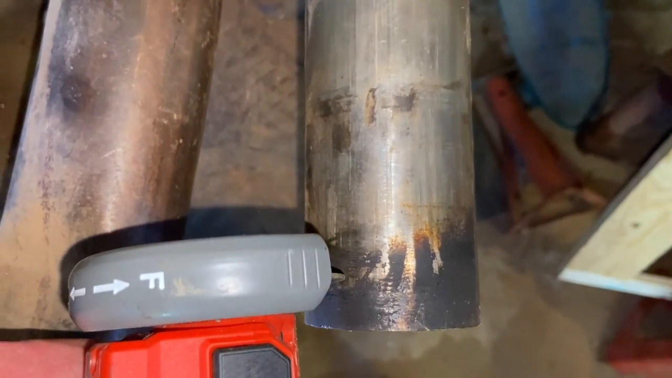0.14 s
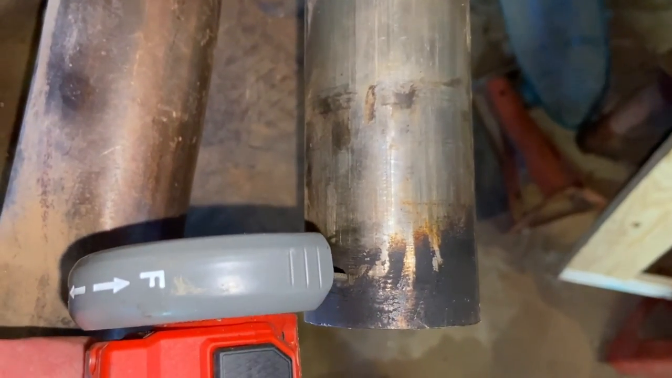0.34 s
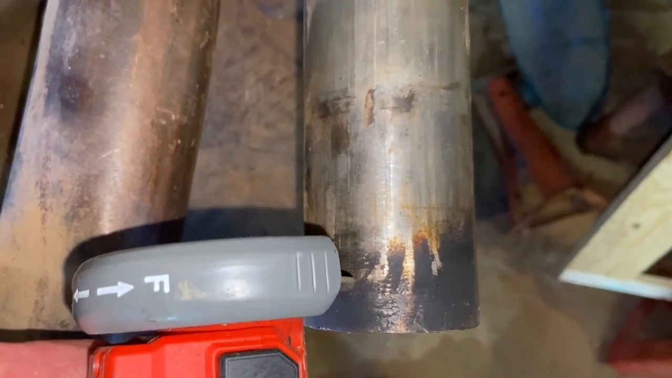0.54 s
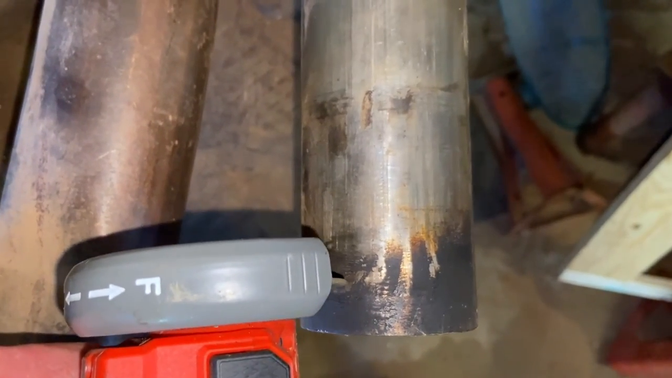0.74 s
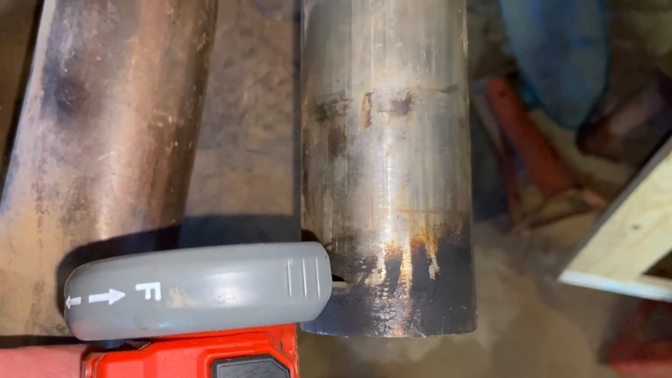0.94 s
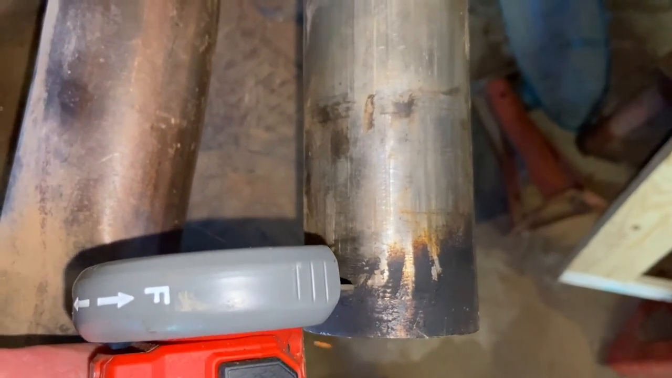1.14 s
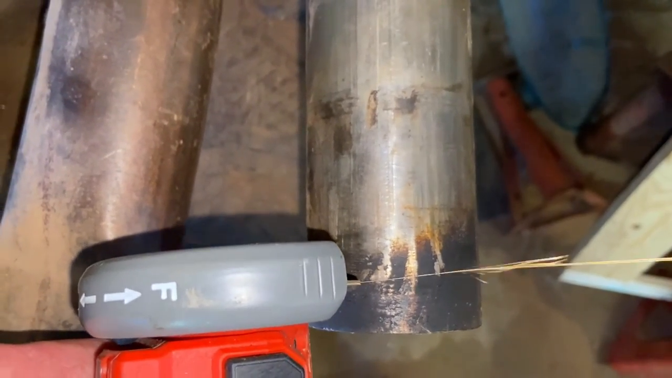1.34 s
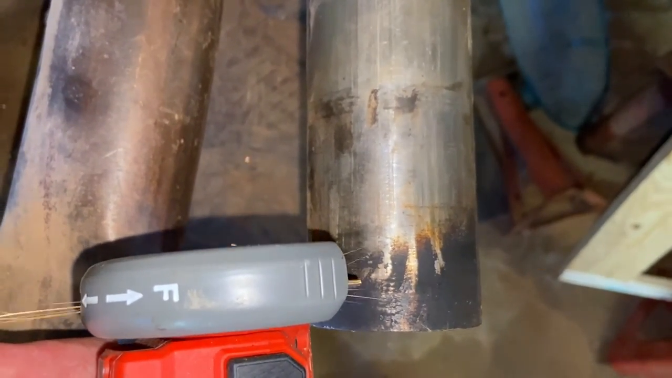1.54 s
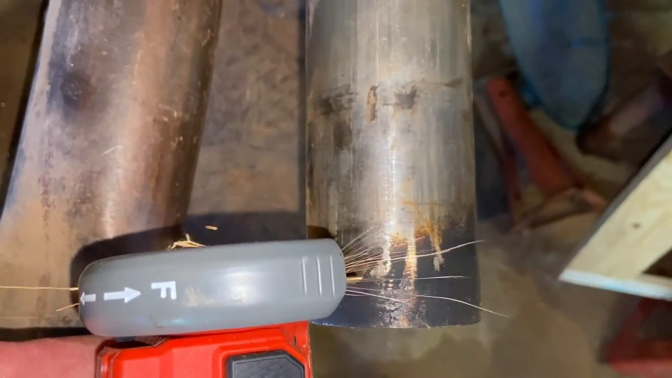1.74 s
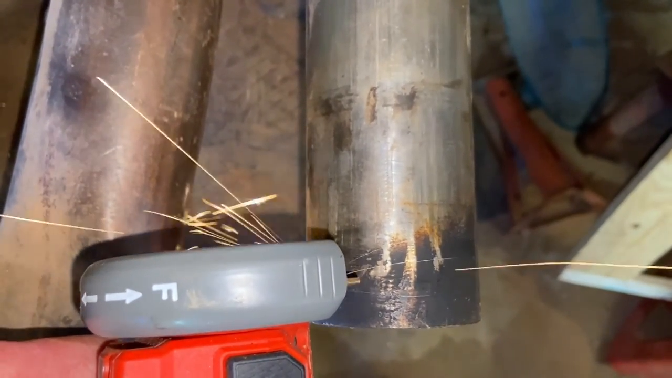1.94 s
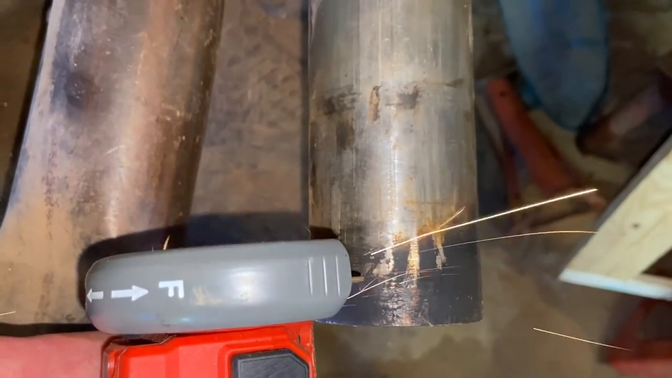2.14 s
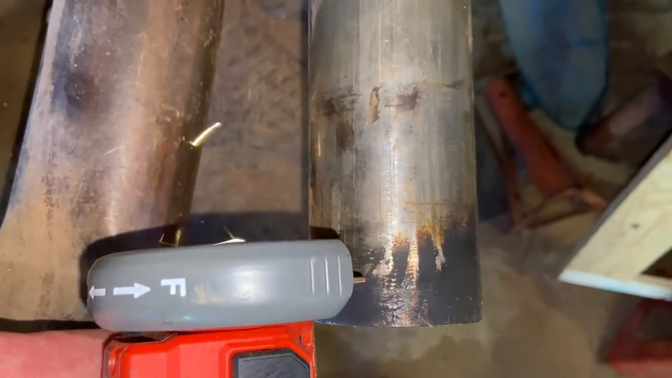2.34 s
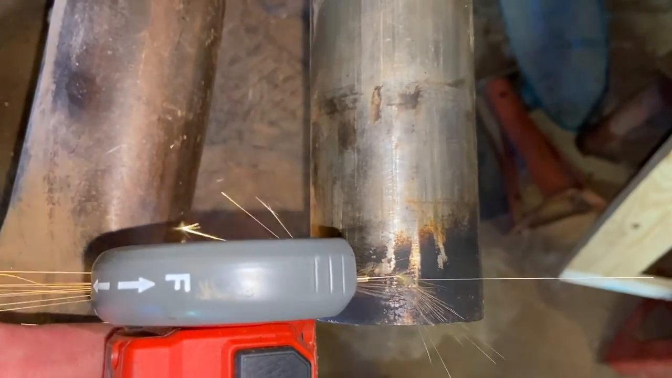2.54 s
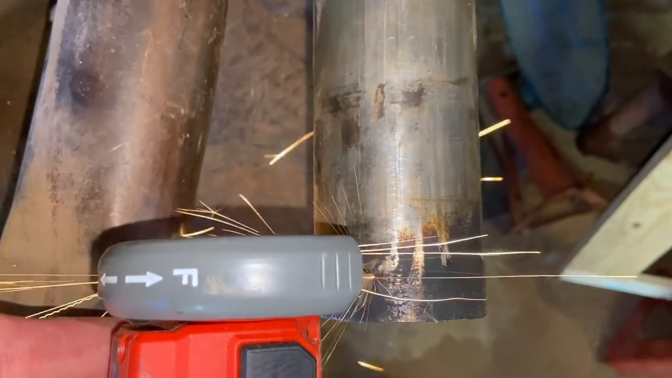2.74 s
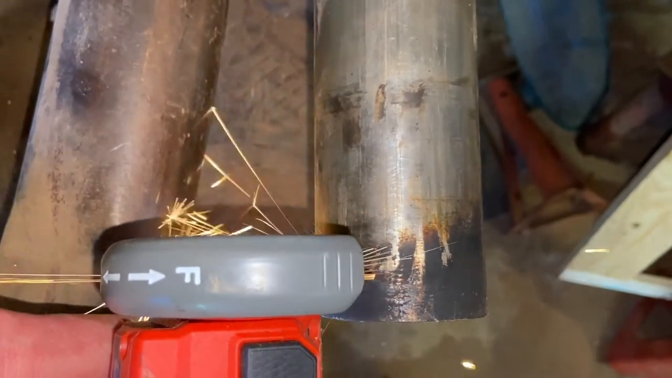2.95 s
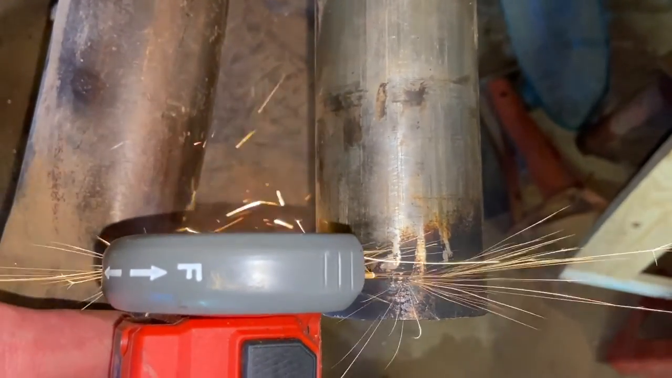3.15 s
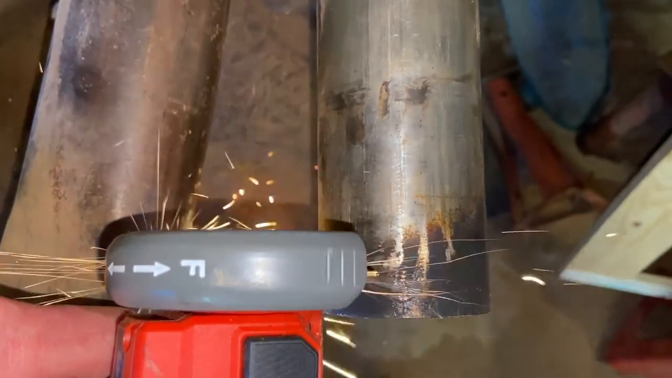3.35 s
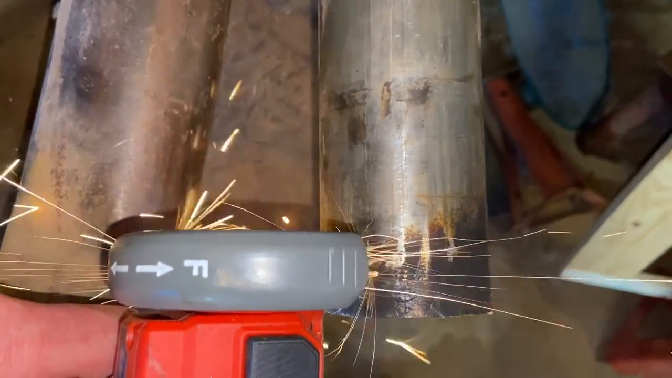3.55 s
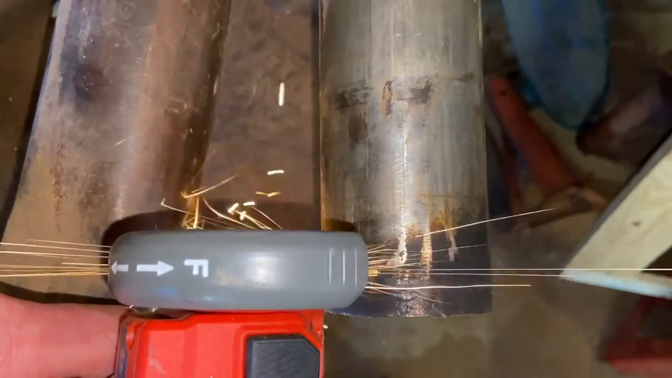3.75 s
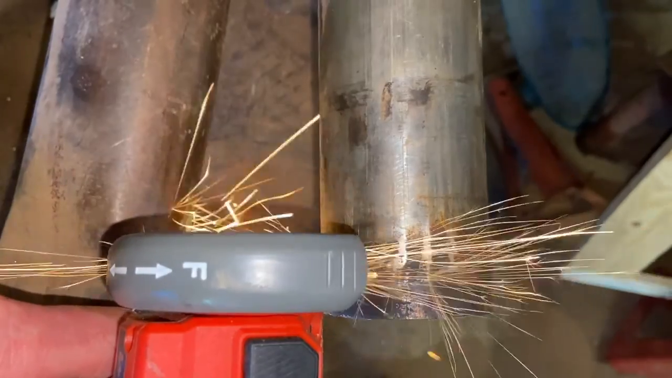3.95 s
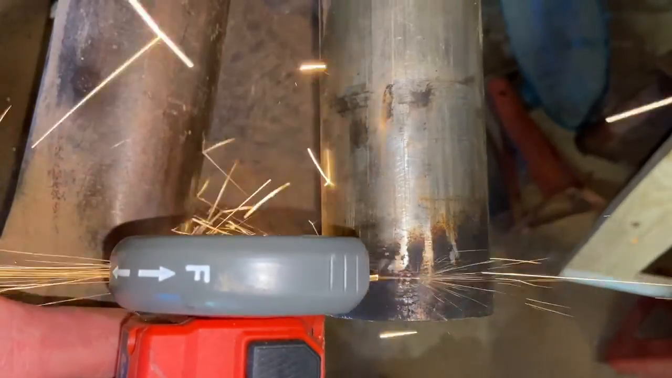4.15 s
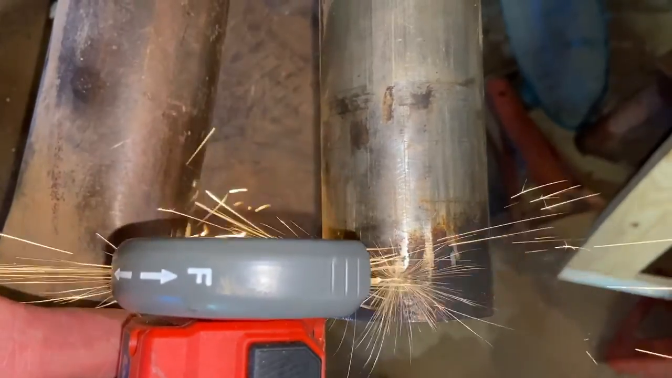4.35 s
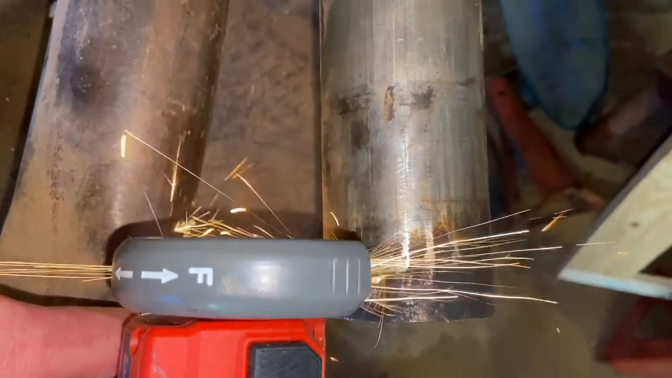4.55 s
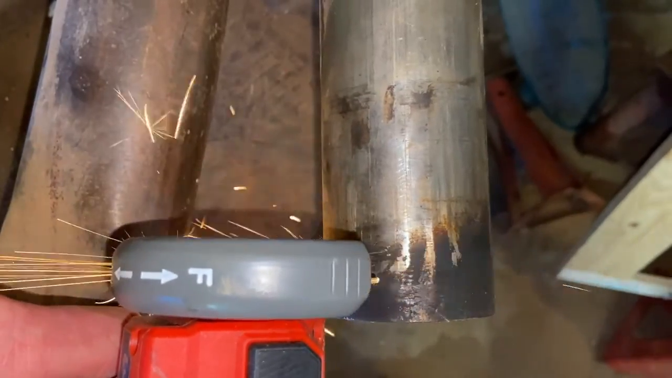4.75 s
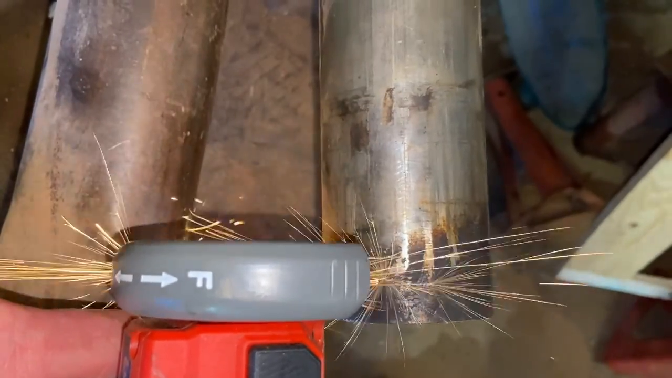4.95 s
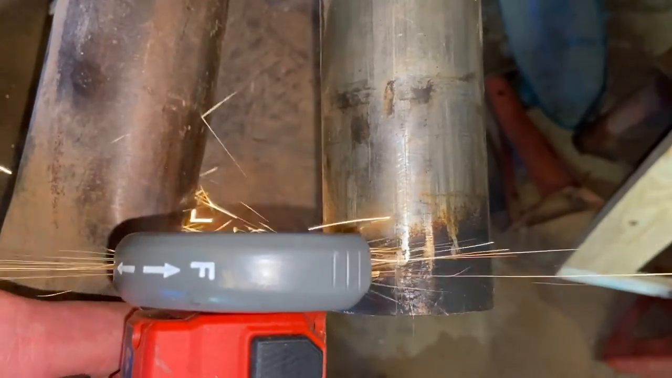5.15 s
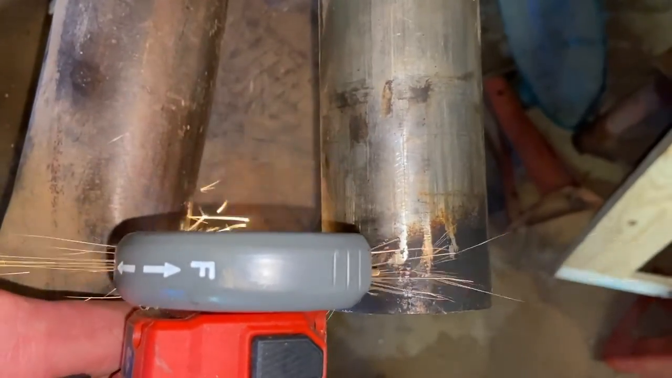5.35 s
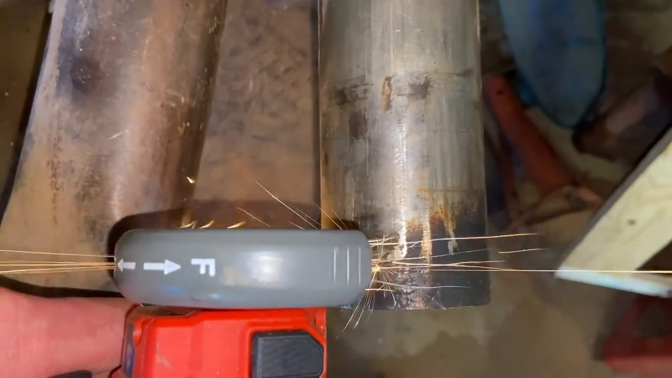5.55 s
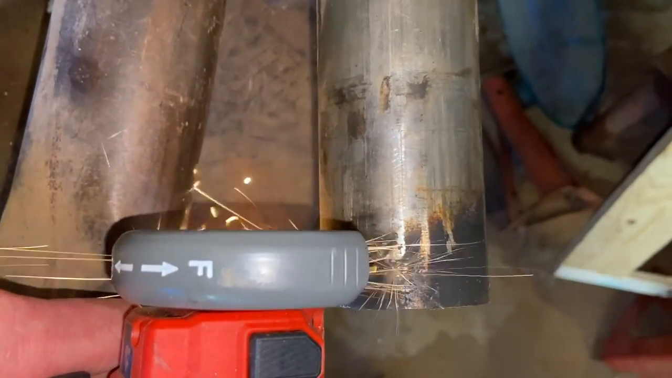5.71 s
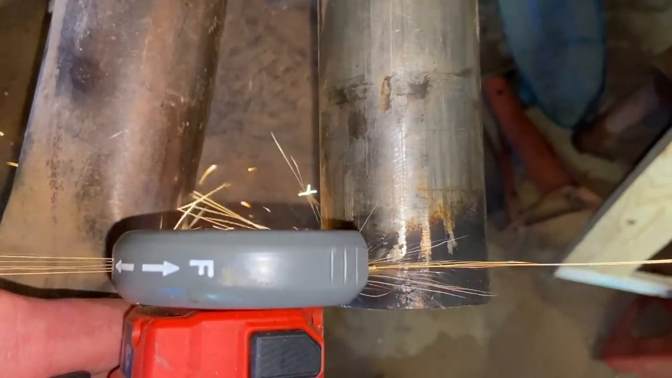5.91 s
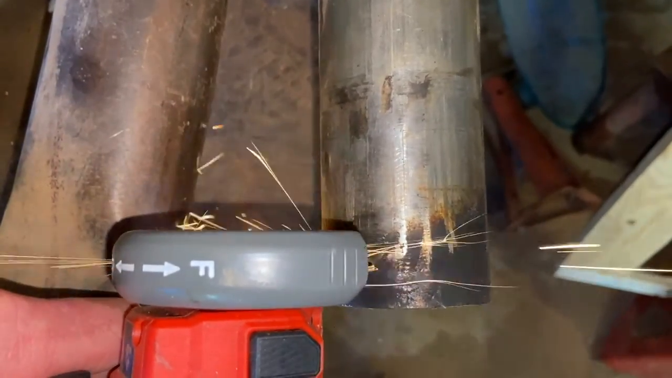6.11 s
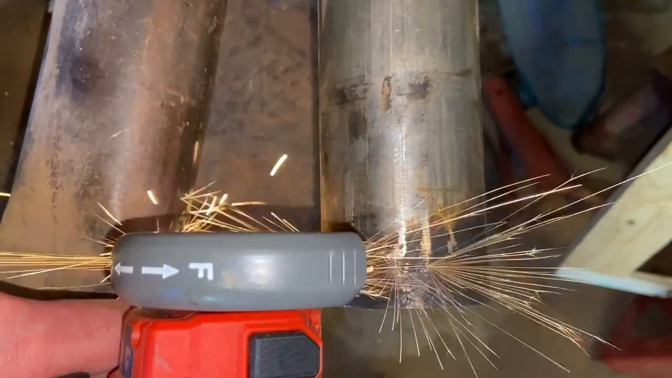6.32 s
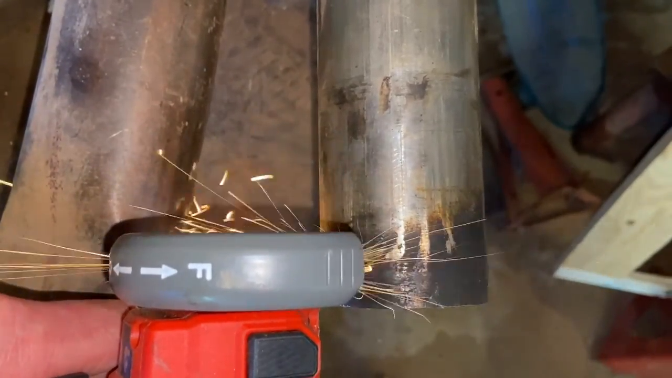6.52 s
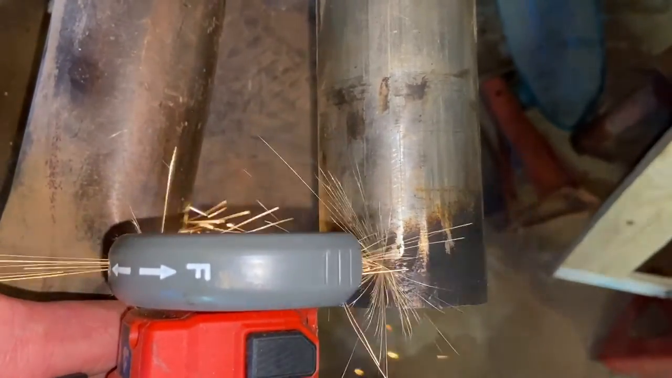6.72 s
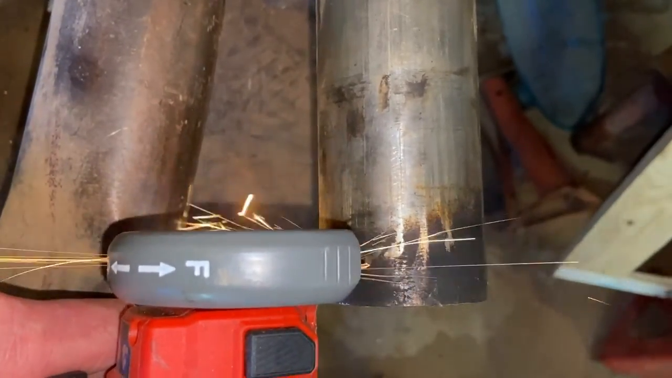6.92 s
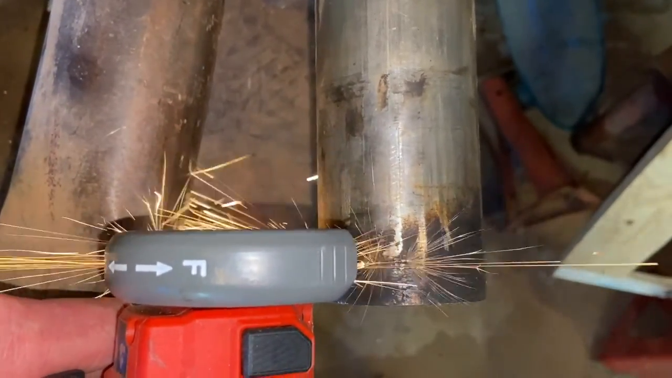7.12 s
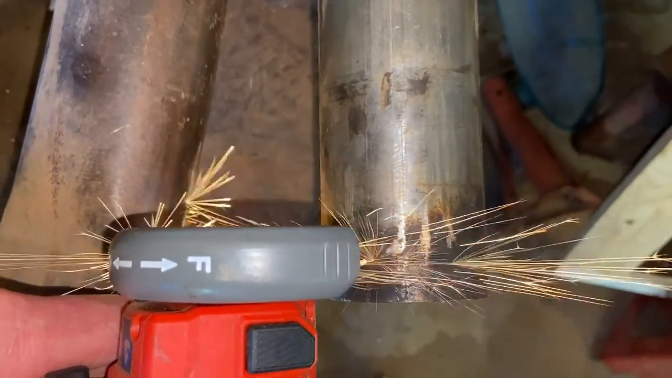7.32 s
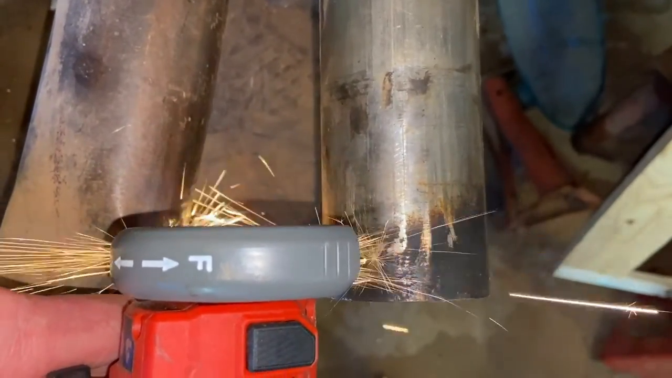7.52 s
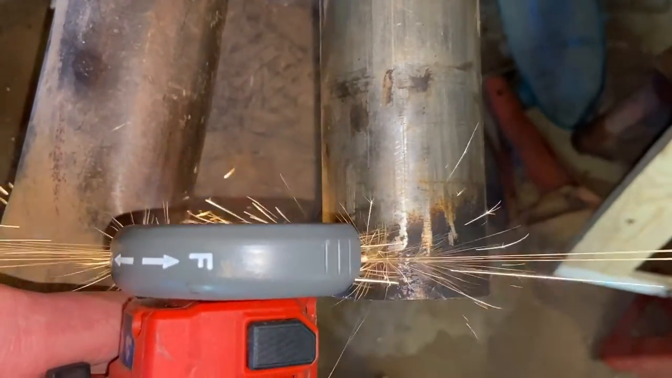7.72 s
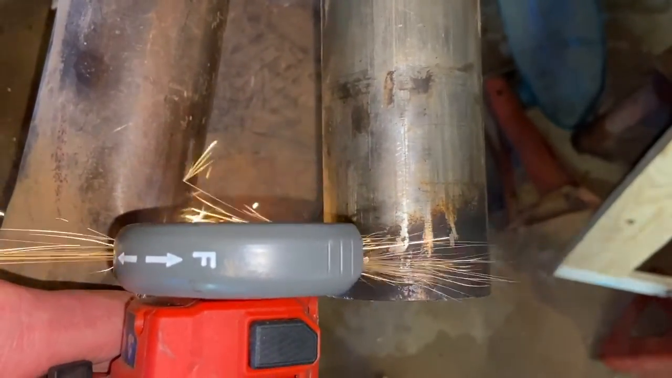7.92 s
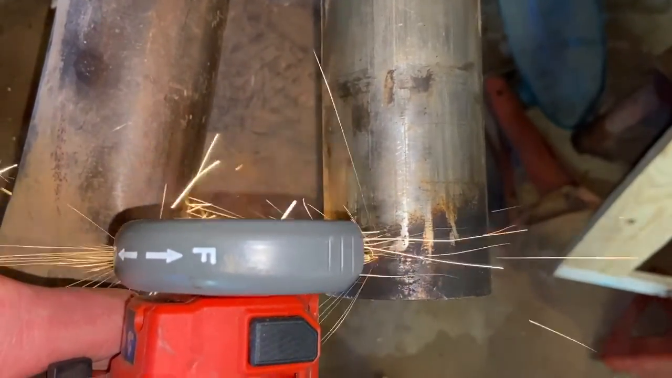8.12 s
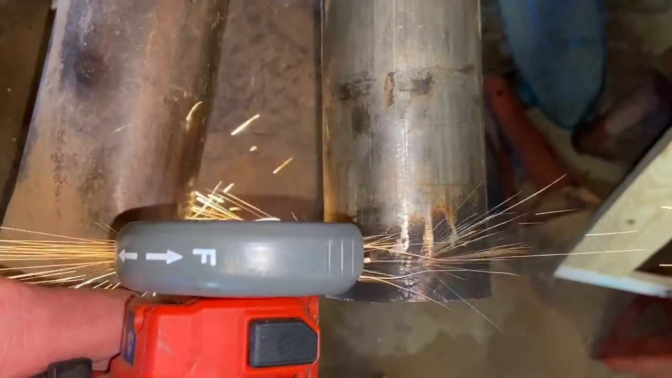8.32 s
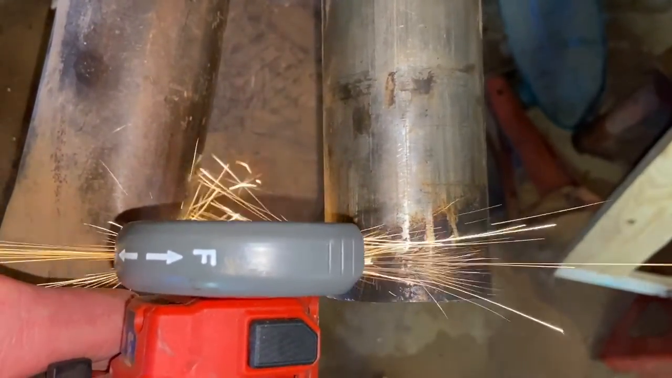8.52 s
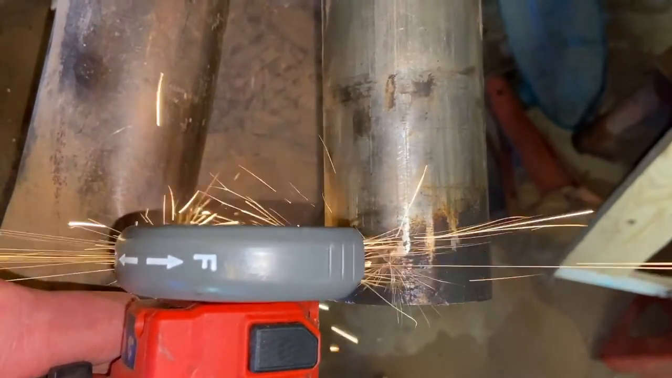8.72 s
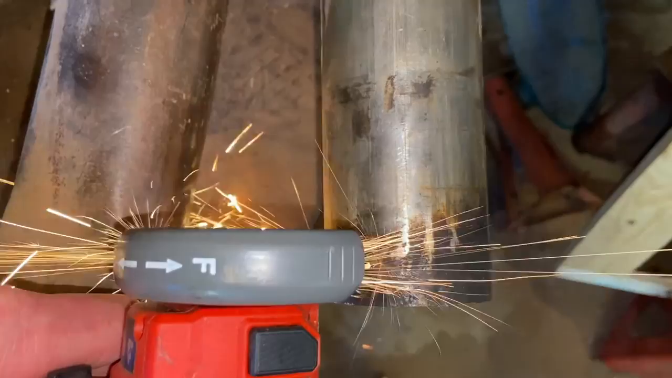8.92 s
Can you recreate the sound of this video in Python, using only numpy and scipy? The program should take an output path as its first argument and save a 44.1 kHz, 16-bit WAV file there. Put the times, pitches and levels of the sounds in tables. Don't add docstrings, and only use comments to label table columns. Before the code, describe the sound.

Trigger click and clattering start, a rapidly climbing motor whine, then a sustained piercing metallic grind as a spinning disc cuts metal pipe.

```python
import sys
import numpy as np
from scipy import signal
from scipy.fft import rfft, irfft, next_fast_len
from scipy.io import wavfile
from scipy.ndimage import uniform_filter1d

SR = 44100
rng = np.random.default_rng(int(sys.argv[2]) if len(sys.argv) > 2 else 0)


def dump_mix(stems):
    frames = np.atleast_2d(stems).T
    limited = np.clip(frames, -1, 1)
    pcm = np.round(limited * 32767).astype(np.int16)
    wavfile.write(sys.argv[1], SR, pcm)


def amplitude_ratio(level_db):
    exponent = np.asarray(level_db, float) / 20
    return 10 ** exponent


N = 395577

# start in seconds, hold in seconds, level in dB.
RUMBLE = [(0, .11, -49.5), (.95, .16, -60), (1.3, 0.025, -63), (2.02, .3, -60), (2.85, .1, -66),
          (3.49, 0.26, -59), (4.8, .03, -64), (5.2, .02, -60), (5.42, 0.25, -66), (6.07, .01, -54),
          (6.5, .06, -67), (6.77, .05, -60), (7.38, .04, -65), (7.62, .03, -57), (7.85, .03, -47),
          (8.1, .1, -71)]
RUMBLE_FLOOR_DB = -70.5
HUM_HZ, HUM_DB, AIR_DB, FAN_DB = 876, -69, -72, -56.5

# time in seconds, level in dB.
SWITCHING = [(.2015, -89), (.2025, -11), (.239, -2), (.243, -32), (.249, -7), (.26, -9), (.285, -28),
             (.31, -50)]
SWITCHING_HZ = 7810
# start in seconds, peak in dB, brightness in Hz.
KNOCKS = [
    (0.2045, -20, 4400),
    (0.228, -19, 500),
    (0.2416, -3, 3660),
    (0.253, -16, 2760),
    (0.273, -11, 2900),
    (0.289, -7, 4560),
    (0.317, -33, 3100),
]
# time in seconds, rattle in dB, housing shudder in dB.
SHAKE = [
    (0.214, -28, -70),
    (0.234, -28.5, -29),
    (0.268, -8.5, -27.5),
    (.39, -15, -48.5),
    (.62, -20, -57),
    (.75, -21, -49),
    (.82, -30.5, -50.5),
    (.95, -42, -49),
]

START_S, PULL_PER_S2, KNEE = .238, 597, 15
# time in seconds, turns per
HELD_SPEED = [
    (1.0, 292.5),
    (1.14, 289.2),
              (1.73, 285.7), (1.97, 280.3), (2.35, 276.9), (2.88, 273.9), (4.45, 273.7), (4.8, 280.5),
         (5.01, 283.2), (5.51, 283), (5.7, 279.9), (6.03, 279.3), (6.22, 282.9), (6.42, 280.7),
         (6.66, 279.6), (6.9, 282.2), (7.07, 281), (7.56, 283.8), (7.88, 277.2), (8.97, 272.9)]
# order, level in dB.
MOTOR = [(1, -35.5), (2, -34), (3, -34), (4, -21.5), (5, -33), (8, -39), (11, -26), (12, -35), (16, -23.5),
         (18, -36), (20, -26), (24, -52), (28, -49), (32, -26)]
# time in seconds, level in dB.
TORQUE = [(.3, -19), (.45, -6), (.65, -1), (.75, -8), (.9, 1), (1.2, -14)]

# pitch in Hz, level in dB above the shaking.
FREE_RING = [(2786, -12), (5314, -4.5)]
# start in seconds, hold in seconds, level in dB.
FIRST_TOUCH = [
    (1.085, .04, -13),
    (1.21, .02, -22),
]

# time in seconds, level in dB.
CUT = [(.19, -140), (.25, -64), (.6, -39), (.75, -35), (1.0, -29), (1.15, -26.5), (1.9, -27), (3, -28.5),
       (4.6, -29), (5.6, -28), (6.5, -32.5), (7.4, -29), (8.97, -30)]
# start in seconds, hold in seconds, level in dB.
JOLT = [
    (.3, 0.0029, -21),
]
# the level in dB of orders 1, 2, 3 and so on.
EDGE_DB = [0, 1.9, 2, -2, 4, -1, -4.5, -2.9, -3, -72, -7.5, -4.5, -5, -1.5, -9, -1.3, 0.5, 1.5, -73, 0.5,
           2.2, 1.5, -6.5, 2, -2.5, -1.5, 1.5, 1.5, 0, -2.8, -3.5, 5]
LOW_ORDERS_DB = -8.5
# start in seconds, hold in seconds, level in dB.
GRIT = [
    (.7, .3, -7),
    (2.35, .05, -21),
    (3.8, .6, -21),
    (4.55, .1, -15),
    (8.6, .05, -23),
]
GRIT_FLOOR_DB = -26

# order, mode pitch in Hz.
LOCKS = [(10, 2802), (19, 5315)]
# width in Hz, level in dB on the mode, level in dB far from it.
SQUEAL = [(9, -18.5, -58.5), (11, -8, -39.5)]
# time in seconds, order 10 in dB, order 19 in dB.
CATCH = [
    (2.05, 7, -5),
    (4.8, -1.5, 1),
    (5.7, 0, -10.5),
    (6.0, -3.5, -2),
    (6.45, 3, -1),
    (6.75, -10, -0.5),
    (7.1, 4, -5),
    (7.75, -10, -2.5),
]
BUILD_S = 0.035

# pitch in Hz, level in dB.
BODY = [(60, -60), (250, -18), (800, -23.5), (1500, -12), (2400, -7.5), (3200, 2.5), (4100, -0.5),
        (4700, 3.5), (7800, 2), (9000, -4), (10500, -6.5), (12500, -10.5), (14000, -4.5), (15600, -23.5)]
MODE_HZ = [1003, 2800, 3212, 3820, 5315, 5585, 6033, 6577, 7122, 7700, 8504, 8770, 9590, 9950, 10900, 11500,
           12425, 15600]
# width in Hz, level in dB above the body.
MODES_OF_WHEEL = [(18.7, 29.1), (17.1, 31.1), (26.2, 12.5), (163, 8.8), (19.9, 21.1), (22.3, 15.3),
                  (28.3, 9.1), (30, 5.3), (35, 1), (125, 7.8), (19.9, 25), (32.4, 8.8), (46.296, 1.8),
                  (87.5, 18.2), (64.815, 5.7), (58.6, 10.2), (50.7, 21.7), (157, 27.8)]
# pitch in Hz, right level in dB, extra turn in radians,
# share of unlike sound from 0 to 1.
PORTS = [(1, 0, 0, .1), (280, .5, .5, .3), (560, -6, 2.6, .55), (1400, -5, 3.8, .45), (1950, 1, 3.9, .45),
         (2230, -2, 6.9, .4), (2800, -1.5, 6.3, .5), (3070, -1, 7.4, .3), (3630, -5, 5.7, .3),
         (4460, -3, 6.1, .4), (5000, -3, 8.6, .4), (5300, -3.5, 8.3, .45), (6140, -6, 10.2, .35),
         (6700, -3.5, 10.1, .35), (7100, -1, 10.0, .12), (9000, 0, 9.87, .02), (13000, 0, 9.8, .02)]
PORT_LAG = 10

DUCK_ABOVE_DB, DUCK_SHARE, RECOVER_DB_PER_S = -17.5, 0.21, 10


def in_time(rows):
    s, *columns = np.transpose(rows)
    return [np.interp(np.arange(N) / SR, s, c) for c in columns]


def swells(rows, floor_db, rise_db_per_s, fall_db_per_s):
    t, level = np.arange(N) / SR, np.full(N, float(floor_db))
    for s, hold, db in rows:
        rise = rise_db_per_s * (t - s)
        fall = fall_db_per_s * (s + hold - t)
        level = np.maximum(level, db + np.minimum(0, np.minimum(rise, fall)))
    return level


def drift(rate, count):
    r = np.exp(-128 * np.pi * rate / SR)
    noise = rng.standard_normal((count, N // 64 + 3002))
    slow = signal.lfilter([1], [1, -2 * r, r * r], noise)[:, 3000:]
    return slow / slow.std(axis=1, keepdims=True)


def stretch(slow):
    return np.interp(np.arange(N) / 64, np.arange(len(slow)), slow)


def band(x, low_hz, high_hz):
    y = signal.sosfilt(signal.butter(2, [low_hz, high_hz], "band", fs=SR, output="sos"), x)
    return y / y.std()


def workshop():
    white = rng.standard_normal((4, N))
    rumble_db = swells(RUMBLE, RUMBLE_FLOOR_DB, rise_db_per_s=140, fall_db_per_s=97)
    rumble = amplitude_ratio(rumble_db) * band(white[0] + .3 * white[1:3] * [[1.3], [.8]], 38, 73.5)
    hum = amplitude_ratio(HUM_DB) * np.sin(2 * np.pi * HUM_HZ * np.arange(N) / SR)
    air = amplitude_ratio(AIR_DB) * band(white[1:3], 100, 840)
    quiet = amplitude_ratio(in_time([(.2, 5.5), (.26, -14)])[0])
    shudder_db = in_time([(.21, 0, -74)] + SHAKE + [(1.2, 0, FAN_DB)])[1]
    shell = amplitude_ratio(shudder_db) * band(white[3] + [[.6], [.2]] * white[1:3], 122, 1780)
    return rumble + quiet * (hum + air) + shell


def switching_tone():
    return amplitude_ratio(in_time(SWITCHING)[0] - 9.5) * np.sin(2 * np.pi * SWITCHING_HZ * np.arange(N) / SR)


def knocks():
    out, t = np.zeros(N), np.arange(900) / SR
    for s, db, hz in KNOCKS:
        out[round(s * SR):][:900] += amplitude_ratio(db) * np.sin(2 * np.pi * hz * t) * np.exp(-t * hz / 2.5)
    return out


def rattle():
    rattle_db = in_time(SHAKE)[0] - 10
    loose = in_time([(.205, 0), (.23, 1), (.95, 1), (1.25, 0)])[0]
    lumps_db = 2.0 * stretch(drift(40, count=1)[0])
    trace = amplitude_ratio(-64) * in_time([(.3, 0), (.8, 1)])[0]
    return (loose * amplitude_ratio(rattle_db + lumps_db) + trace) * rng.standard_normal((2, N))


def speed():
    pull = PULL_PER_S2 * np.maximum(np.arange(N) / SR - START_S, 0)
    held = in_time(HELD_SPEED)[0]
    slower = -KNEE * np.logaddexp(-pull / KNEE, -held / KNEE)
    return uniform_filter1d(slower, size=1200)


def shaft_angle():
    tremble = 0.0014 * stretch(drift(56.0, count=1)[0])
    return 2 * np.pi * np.cumsum(speed() * (1 + tremble)) / SR


def motor_whine(angle):
    whine = sum(amplitude_ratio(db) * np.sin(order * angle) for order, db in MOTOR)
    return whine * amplitude_ratio(in_time(TORQUE)[0])


def housing(hz):
    return amplitude_ratio(-21.0) + 1 / (1 + 2j * (hz - 3900) / 700)


def free_ring():
    t = np.arange(N) / SR
    shaken = amplitude_ratio(in_time([(.24, -82, 0)] + SHAKE[2:] + [(1.0, -80, 0)])[0])
    shaken = shaken + amplitude_ratio(swells(FIRST_TOUCH, -99, rise_db_per_s=395, fall_db_per_s=244))
    burst, sway = drift(4.6, count=2), drift(2.04, count=2)
    ring = 0
    for k, (hz, db) in enumerate(FREE_RING):
        tone = np.sin(2 * np.pi * hz * t + 2.44 * stretch(sway[k]))
        ring = ring + amplitude_ratio(db + 5.9 * stretch(burst[k])) * tone
    return shaken * ring


def rubbing(angle, count, wear_db, wear_rate):
    cut_db = in_time(CUT)[0]
    high_db = np.maximum(cut_db, swells(JOLT, -99, rise_db_per_s=668, fall_db_per_s=224))
    edge_db = np.pad(EDGE_DB, (0, 57))[:count, None]
    size = amplitude_ratio(edge_db + wear_db * drift(wear_rate, count) + 2.6 * drift(20, count))
    phase = rng.uniform(0, 2 * np.pi, (count, 1)) + .6 * drift(10, count)
    step, order, low, high = np.exp(1j * angle), 1, 0, 0
    for k, pattern in enumerate(size * np.exp(1j * phase)):
        order = order * step
        tone = (stretch(pattern) * order).real
        if k < 9:
            low = low + tone
        else:
            high = high + tone
    return amplitude_ratio(cut_db + LOW_ORDERS_DB) * low + amplitude_ratio(high_db - 8.5) * high


def grit(angle):
    grit_db = swells(GRIT, GRIT_FLOOR_DB, rise_db_per_s=30, fall_db_per_s=42)
    high_pass = signal.butter(2, 3000, "high", fs=SR, output="sos")
    grains = signal.sosfilt(high_pass, rng.standard_normal((2, N)))
    return amplitude_ratio(in_time(CUT)[0] + grit_db + 7) * (1 + 1.7 * np.cos(angle)) * grains


def squeal(angle):
    cutting_db, turns, catches = in_time(CUT)[0] + 28, speed(), in_time(CATCH)
    lag = np.exp(-1 / (BUILD_S * SR))
    flutter_db, sway = 3.82 * drift(16.0, count=2), 0.91 * drift(1.43, count=2)
    out = 0
    for k, (order, hz) in enumerate(LOCKS):
        width_hz, top_db, far_db = SQUEAL[k]
        near_db = -10 * np.log10(1 + (2 * (order * turns - hz) / width_hz) ** 2)
        near_db = signal.lfilter([1 - lag], [1, -lag], near_db)
        level_db = cutting_db + np.maximum(top_db + catches[k] + near_db, far_db)
        tone = np.sin(order * angle + stretch(sway[k]))
        out = out + amplitude_ratio(level_db + 2.5 + stretch(flutter_db[k])) * tone
    return out


def body(hz, ring_db):
    response = 1
    for k, (mode_hz, (width_hz, db)) in enumerate(zip(MODE_HZ, MODES_OF_WHEEL)):
        response = response + (-1) ** k * amplitude_ratio(db + ring_db) / (1 + 2j * (hz - mode_hz) / width_hz)
    colour_hz, colour_db = np.transpose(BODY)
    return response * amplitude_ratio(np.interp(np.log(hz), np.log(colour_hz), colour_db))


def ports(hz, alike, unlike):
    at_hz, *columns = np.transpose(PORTS)
    right_db, turn, share = [np.interp(hz, at_hz, c) for c in columns]
    late = np.exp(1j * (turn - 2 * np.pi * hz * PORT_LAG / SR))
    left = late * (alike + share * unlike)
    right = amplitude_ratio(right_db) * (alike - share * unlike)
    return np.array([left, right])


def scene():
    angle, size = shaft_angle(), next_fast_len(N + SR // 2)
    hz = np.arange(size // 2 + 1) * SR / size + 1e-3
    alike = rubbing(angle, count=57, wear_db=2.5, wear_rate=0.71)
    unlike = rubbing(angle, count=24, wear_db=4.5, wear_rate=0.97)
    wheel = body(hz, ring_db=-1.5) * rfft(grit(angle) + [alike, unlike], size)
    wheel += body(hz, ring_db=5.5) * rfft(rattle(), size)
    wheel += rfft([squeal(angle) + free_ring(), .5 * squeal(angle)], size)
    wheel[0] += housing(hz) * rfft(motor_whine(angle), size)
    wheel[0] += rfft(switching_tone() + knocks(), size)
    return irfft(ports(hz, *wheel), size)[:, :N] + workshop()


def band_limit(x):
    return signal.sosfilt(signal.butter(12, 17090, fs=SR, output="sos"), x)


def record(dry):
    climb = RECOVER_DB_PER_S * np.arange(N) / SR
    level_db = 10 * np.log10(uniform_filter1d(np.mean(dry ** 2, axis=0), size=2000) + 1e-12)
    held_db = np.maximum.accumulate(level_db + climb) - climb
    over_db = np.maximum(held_db - DUCK_ABOVE_DB, 0)
    x = dry * amplitude_ratio(-DUCK_SHARE * uniform_filter1d(over_db, size=3001, origin=1500))
    x = signal.sosfilt(signal.ellip(12, .5, 70, 15750, fs=SR, output="sos"), x)
    return band_limit(np.clip(x, -1, 1))


dry = scene()
out = record(dry)
dump_mix(out)
```